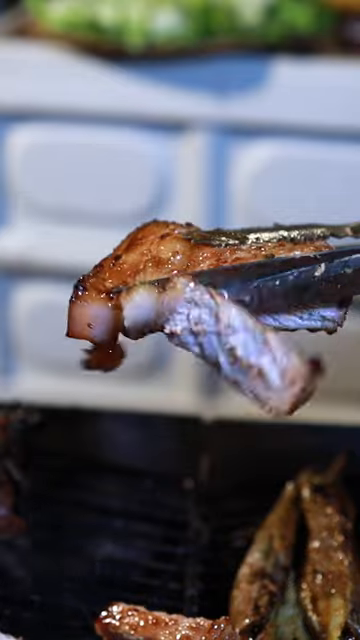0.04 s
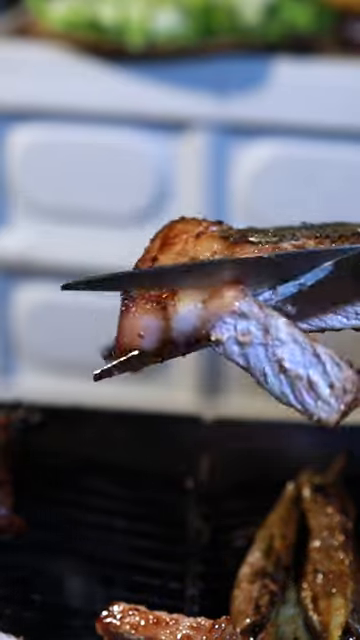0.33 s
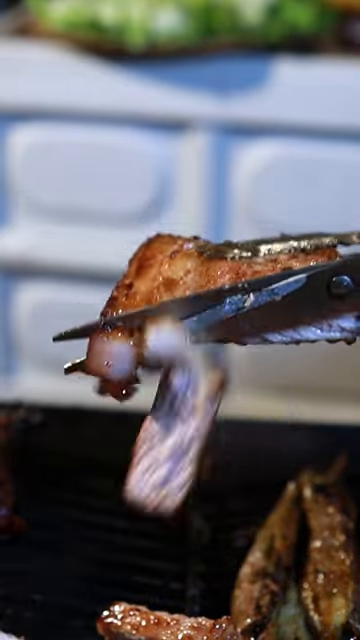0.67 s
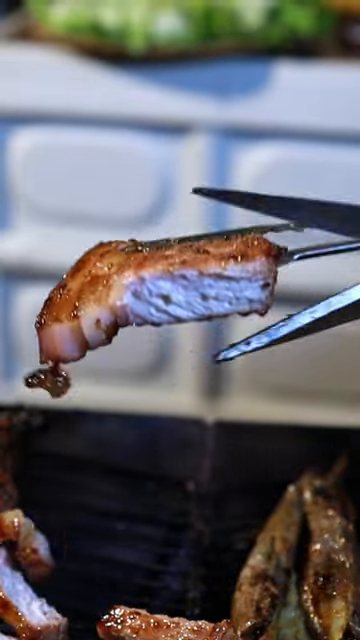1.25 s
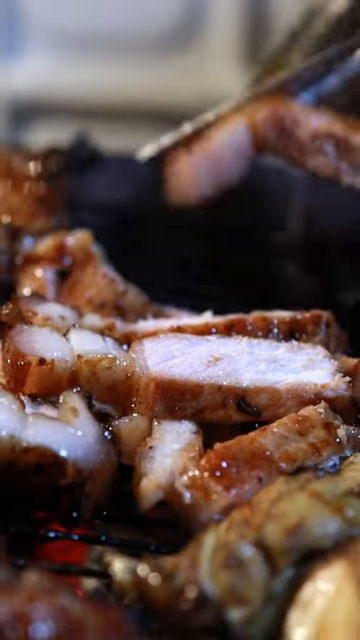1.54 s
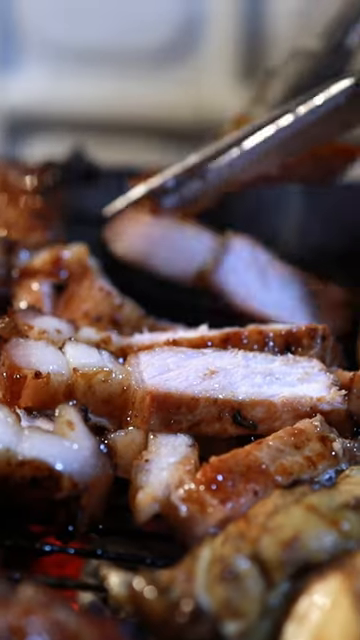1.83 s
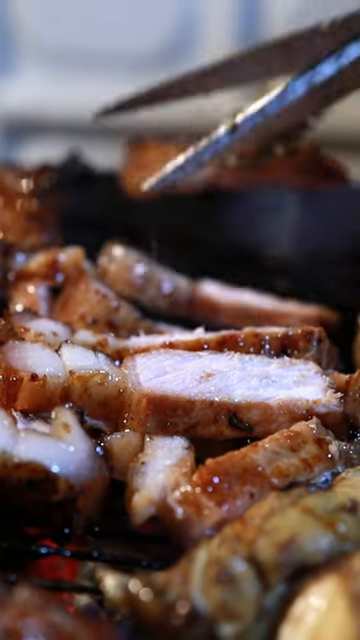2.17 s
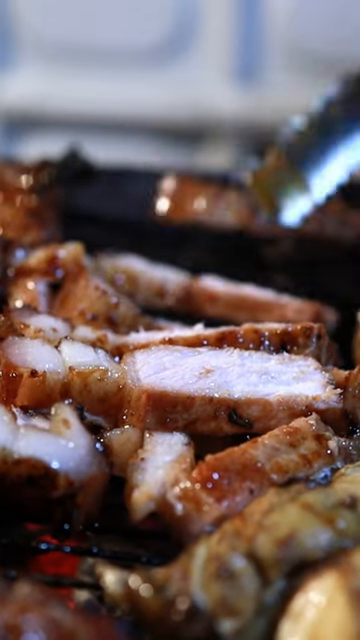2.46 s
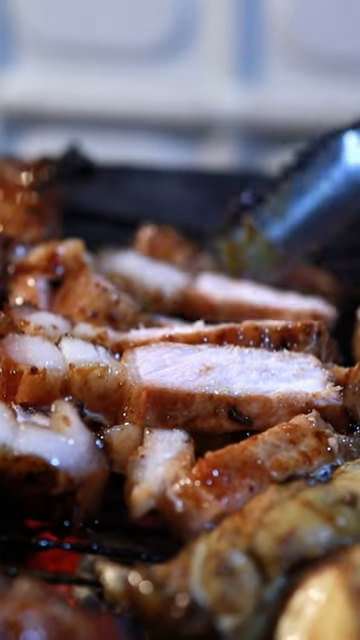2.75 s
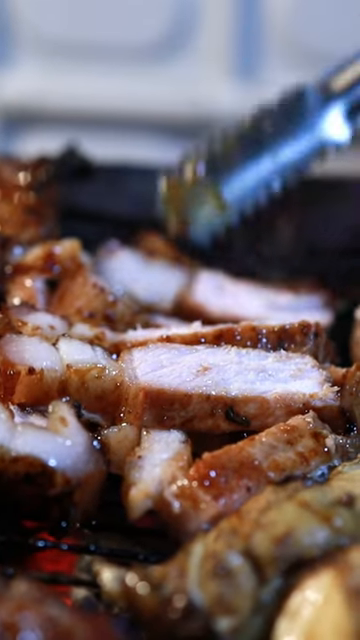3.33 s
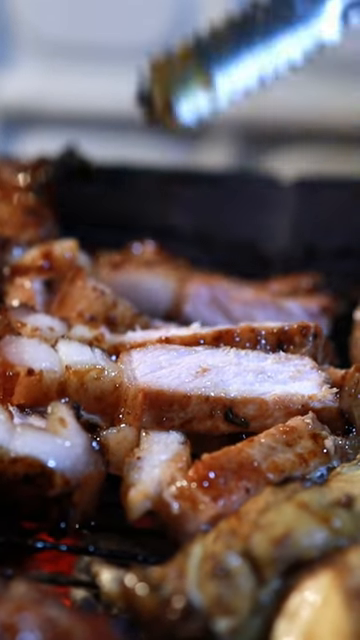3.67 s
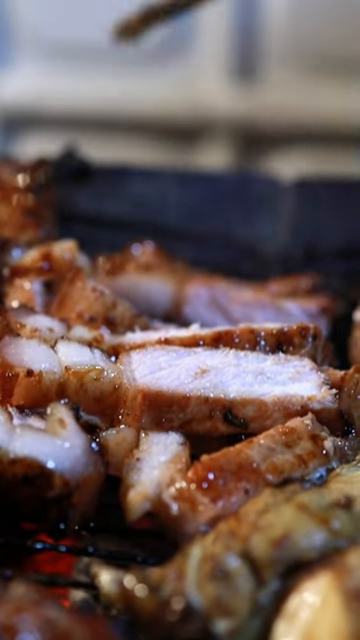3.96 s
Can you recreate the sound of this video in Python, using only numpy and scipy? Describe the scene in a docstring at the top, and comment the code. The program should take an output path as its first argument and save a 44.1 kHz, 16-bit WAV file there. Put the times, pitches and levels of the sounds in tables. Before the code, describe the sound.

Pork sizzles and pops close by on an outdoor grill, lightly at first. Scissors snap shut sharply at 0.9 seconds and scrape softly open. From 1.5 seconds the sizzle strengthens, and the scissors snap again at 2. Tongs knock dully on the meat, hardest at 2.8, then click on the grate around 3.2 to 3.4 before the sizzle swells. A faint hiss, trill and low air rumble lie behind.

```python
"""Outdoors, one microphone close to a charcoal grill. Pork sizzles and pops over a low rumble of air,
a far hiss, a shrill trill and, at first, faint calls. Scissors crunch through a slice, snap shut
at 0.9 s and scrape open. From 1.5 s the fat fries harder as fresh meat lands; at 2 s the blades snap
again. Tongs knock the pieces about, hardest at 2.8 s, then click on the grate as the sizzle swells."""
import sys
import numpy as np
from scipy import signal
from scipy.fft import rfft, irfft, next_fast_len
from scipy.io import wavfile
from scipy.ndimage import uniform_filter1d

SR = 44100
rng = np.random.default_rng(int(sys.argv[2]) if len(sys.argv) > 2 else 0)


def output_pcm(signal):
    """Save a mono or channel-first signal as 16-bit PCM at the path in sys.argv[1].

    Samples are clipped to [-1, 1] before scaling.
    """
    pcm = np.clip(np.atleast_2d(signal).T, -1, 1) * 32767
    wavfile.write(sys.argv[1], SR, np.round(pcm).astype(np.int16))


N = 176400
TIME = np.arange(N) / SR


def from_db(db):
    """Decibels to gain."""
    return 10 ** (np.asarray(db) / 20)


def unit_power(x):
    """Scale to a mean square of one."""
    return x / np.sqrt(np.mean(x ** 2) + 1e-20)


def level(rows):
    """Gain over time from (t/s, level/dB) points."""
    return from_db(np.interp(TIME, *np.transpose(rows)))


def colour(x, points):
    """Causal filter of unit mean power that follows (f/Hz, level/dB) points."""
    size = next_fast_len(N + SR // 2, True)
    hz, db = np.transpose(points)
    log_hz = np.log(np.fft.rfftfreq(size, 1 / SR) + 1)
    gain = unit_power(from_db(np.interp(log_hz, np.log(hz), db)))
    cepstrum = irfft(np.log(gain), size)
    cepstrum[1:size // 2] *= 2   # fold to minimum phase
    cepstrum[size // 2 + 1:] = 0
    return irfft(rfft(x, size) * np.exp(rfft(cepstrum)), size)[:N]


def fade(t60):
    """A quarter second of exponential decay."""
    return from_db(-60 * TIME[:SR // 4] / t60)


def burst(t60):
    """A dying puff of noise."""
    decay = fade(t60)
    return decay * np.tanh(2 * rng.standard_normal(len(decay)))


def ring(modes, ratio=1):
    """One blow on (f/Hz, level/dB, t60/s) modes of alternating sign."""
    t = TIME[:SR // 4]
    return sum((-1) ** k * from_db(db) * fade(t60) * np.sin(2 * np.pi * hz * ratio * t)
               for k, (hz, db, t60) in enumerate(modes))


def place(events):
    """Lay (t/s, level/dB, sound) events on the time line."""
    out = np.zeros(N)
    for t, db, sound in events:
        start = max(int(t * SR), 0)
        part = sound[:max(N - start, 0)]
        out[start:start + len(part)] += from_db(db) * part
    return out


# Air around the microphone: spectrum (f/Hz, level/dB) and course (t/s, level/dB)
AIR_SPECTRUM = [(12, -21.5), (25, -7.5), (32, 3), (44, -14.5), (62, -13.5), (85, -8), (110, -10),
                (135, -14), (165, -12.5), (260, -22.5), (450, -22.5), (900, -26.5), (3000, -47),
                (16000, -70)]
AIR_COURSE = [(0, -50.5), (.45, -49), (.8, -49), (1.4, -49.5), (1.9, -47.5), (2.35, -47.5), (2.7, -48.5),
              (3.3, -49), (4, -51)]
def air_rumble():
    """Open air rumbles low and almost steadily."""
    return level(AIR_COURSE) * colour(rng.standard_normal(N), AIR_SPECTRUM)


# Hiss in the distance: spectrum (f/Hz, level/dB) and course (t/s, level/dB)
HISS_SPECTRUM = [(200, -32.5), (700, -15), (1000, -10), (1270, -5.5), (1500, 1), (1830, -4), (2200, -0.5),
                 (2700, -3), (3600, -12.5), (4400, -16), (5500, -13), (6800, -20.5), (16000, -44)]
HISS_COURSE = [(0, -42.5), (.14, -45), (.3, -42.5), (.53, -45), (.75, -42.5), (1.0, -44), (1.15, -42),
               (1.28, -46.5), (1.47, -46), (2.0, -46.5), (2.14, -42), (2.3, -47), (2.55, -43.5),
               (2.95, -42.5), (3.4, -45.5), (4, -51.5)]
def far_hiss():
    """A midrange hiss rises and falls far behind the grill."""
    return level(HISS_COURSE) * colour(rng.standard_normal(N), HISS_SPECTRUM)


# Trill in the distance: spectrum (f/Hz, level/dB) and course (t/s, level/dB)
TRILL_SPECTRUM = [(1500, -39.5), (2300, -13), (2700, -5), (2900, 2), (3200, -3.5), (3600, -13),
                  (5000, -32.5)]
TRILL_COURSE = [(0, -47), (.15, -44.5), (.29, -39.5), (.45, -44), (.6, -46.5), (.95, -47), (1.2, -40),
                (1.35, -44), (1.55, -46.5), (2.5, -48.5), (3.0, -45.5), (3.3, -52), (3.8, -44)]
def far_trill(throb_hz=31.82, depth=0.43, wander_share=0.153):
    """A shrill band of noise throbs at a wandering rate, like distant frogs."""
    band = level(TRILL_COURSE) * colour(rng.standard_normal(N), TRILL_SPECTRUM)
    wander = unit_power(uniform_filter1d(rng.standard_normal(N), size=SR // 10))
    cycles = np.cumsum(throb_hz * (1 + wander_share * wander)) / SR
    return band * unit_power(1 + depth * np.sin(2 * np.pi * cycles))


# Calls far off (t/s, length/s, level/dB) and their spectrum (f/Hz, level/dB)
CALLS = [(0.192, 0.053, -42.5), (0.396, 0.079, -45), (0.608, 0.08, -39.5), (1.03, 0.1, -42),
         (1.318, 0.08, -40.5)]
CALL_SPECTRUM = [(500, -31), (850, -13), (1050, 2), (1280, -7), (1700, -0.5), (2100, -1), (2800, -13),
                 (6000, -45)]
def far_calls():
    """Short hoarse swells in two broad resonances, blurred by distance."""
    swells = place((t, db, np.sqrt(np.hanning(int(length * SR)))) for t, length, db in CALLS)
    return swells * colour(rng.standard_normal(N), CALL_SPECTRUM)


# Soft low bumps (t/s, level/dB, f/Hz)
LOW_BUMPS = [(.14, -42.5, 335), (1.02, -37, 215), (2.02, -43, 339), (2.955, -43, 256)]
def bumps(t60=0.071):
    """Each faint bump is one damped low tone."""
    return place((t, db, ring([(hz, 0, t60)])) for t, db, hz in LOW_BUMPS)


def knock(hz):
    """A soft contact sets off a heavily damped thud, with a little grit on top."""
    push = signal.unit_impulse(SR // 4) + 1e-18
    soft_push = signal.lfilter(*signal.butter(4, hz * 1.57, fs=SR), push)
    thud = signal.lfilter(*signal.butter(2, hz * 0.51, "high", fs=SR), soft_push)
    return thud / np.abs(thud).max() + from_db(-10) * burst(t60=0.0087)


# Tongs close by: modes (f/Hz, level/dB, t60/s), clicks (t/s, level/dB), knocks (t/s, level/dB, f/Hz)
TONG_MODES = [(1150, -8, 0.0027), (2400, -7, 0.0018), (5220, -6, .0055), (6250, -4, 0.0039),
              (10270, -10, 0.0058), (12800, -13, .004)]
GRATE_CLICKS = [(3.2018, -20), (3.2213, -10), (3.2324, -8), (3.2490, -16), (3.2599, -10.5), (3.274, -10),
                (3.2824, -19), (3.379, -6.5)]
MEAT_KNOCKS = [(.679, -32.5, 910), (.718, -28, 905), (.812, -28, 1110), (1.579, -27.5, 900),
               (1.636, -26, 1210), (1.671, -31, 995), (1.7327, -10, 940), (1.779, -23, 990),
               (2.836, -5.5, 1110), (3.349, -26, 1100), (3.353, -23.5, 1200), (3.4552, -17.5, 920)]
def tongs():
    """Tongs ring briefly on the grate and knock dully on the meat."""
    clicks = place((t, db, ring(TONG_MODES, ratio=rng.normal(1, 0.017))) for t, db in GRATE_CLICKS)
    knocks = place((t, db, knock(hz)) for t, db, hz in MEAT_KNOCKS)
    return clicks + knocks


# Blades parting: the rub's course (t/s, level/dB) and spectrum (f/Hz, level/dB)
RUB_COURSE = [(1.01, -90), (1.03, -47), (1.052, -39.5), (1.075, -53), (1.1, -49), (1.13, -92)]
RUB_SPECTRUM = [(1500, -21), (4800, -11), (5200, 1), (5600, -12), (7700, -15), (16000, -24)]
# Their ting (t/s, level/dB, f/Hz, t60/s)
BLADE_TINGS = [(1.160, -30, 12300, .025), (1.160, -33, 9450, .03)]
def scissors_open():
    """Steel slides on steel with a faint, rough ring, then tings."""
    rub = level(RUB_COURSE) * colour(rng.standard_normal(N), RUB_SPECTRUM)
    tings = place((t, db, ring([(hz, 0, t60)])) for t, db, hz, t60 in BLADE_TINGS)
    return rub + tings


# Two snaps near the microphone, three chattering contacts each (t/s, level/dB, pitch ratio)
BLADE_CONTACTS = [(.8829, 2, 1.006), (.8839, -6.5, 1.03), (.8858, -12.5, 1), (1.9576, 1, 0.99),
                  (1.9584, -1.5, 1.26), (1.9606, -12, 1.08)]
# The blades' modes (f/Hz, level/dB, t60/s) and the crack's spectrum (f/Hz, level/dB)
BLADE_MODES = [(1500, -11, 0.012), (1814, -12, 0.0076), (2130, -20, 0.011), (2620, -16, 0.011),
               (3380, -14.5, 0.0096), (3890, -14, 0.0092), (4840, -5.5, 0.0081), (5210, -14, 0.018),
               (6550, -17, 0.011), (9650, -5, 0.0093), (10600, -7.5, 0.012), (11950, -7.5, 0.0064),
               (14100, -18, 0.0091)]
CRACK_SPECTRUM = [(60, -6), (230, -5.5), (400, -12), (900, -13.5), (1500, 1.5), (3200, -2), (5200, 4),
                  (6300, 0), (8000, -1.5), (10000, 2.5), (13500, -3), (16000, 0)]
def scissors_shut(crack_db=-2.5, tail_db=-24.5):
    """The blades meet with a crack, a hand-damped ring and a short tail."""
    rings = place((t, db, ring(BLADE_MODES, ratio)) for t, db, ratio in BLADE_CONTACTS)
    cracks = place((t, db, from_db(crack_db) * burst(t60=0.01) + from_db(tail_db) * burst(t60=0.11))
                   for t, db, _ in BLADE_CONTACTS)
    return rings + colour(cracks, CRACK_SPECTRUM)


# Close pops of fat and fibre (t/s, level/dB) and their spectrum (f/Hz, level/dB)
FAT_POPS = [(0.059, -19), (0.072, -22), (0.084, -22), (.128, -29), (.320, -19.5), (.353, -26), (0.379, -27),
            (.429, -25), (0.456, -18.5), (.671, -23), (.680, -18), (.720, -19.5), (.786, -28), (.811, -18),
            (.859, -21.5), (.989, -29), (1.118, -17), (1.161, -26), (1.219, -28), (1.255, -24),
            (1.317, -16.5), (1.340, -20), (1.603, -12.5), (1.636, -13), (1.671, -17), (1.7328, -11.5),
            (1.843, -17.5), (2.338, -27), (2.349, -22.5), (2.496, -16.5), (2.585, -20), (2.916, -18.5),
            (3.0138, -9), (3.031, -16.5), (3.311, -13), (3.4555, -14.5), (3.631, -10.5), (3.645, -17),
            (3.653, -15), (3.752, -16), (3.787, -18), (3.809, -10), (3.936, -18), (3.944, -17.5),
            (3.961, -16.5)]
POP_SPECTRUM = [(200, -13.5), (800, -4), (2500, 0), (5000, 2), (7500, 0.5), (12500, 0), (16000, -3.5)]
def pops(gain_db=-1.5):
    """Larger bubbles and parting fibres crack one by one."""
    cracks = place((t, db + gain_db, burst(t60=0.0048)) for t, db in FAT_POPS)
    return colour(cracks, POP_SPECTRUM)


# Pork frying close by: vigour (t/s, level/dB), spectrum (f/Hz, level/dB), treble shelf (t/s, level/dB)
FRY_VIGOUR = [(0, -38), (.055, -35), (.095, -45.5), (.2, -49.5), (.45, -46.5), (.6, -45.5), (.72, -45),
              (1.0, -46), (1.12, -51), (1.22, -47), (1.525, -47), (1.545, -35), (1.595, -38),
              (1.635, -29.5), (1.66, -36.5), (1.8, -38.5), (2.02, -38.5), (2.06, -35), (2.15, -34.5),
              (2.2, -37.5), (2.4, -34), (2.65, -35.5), (2.83, -36), (3.1, -37.5), (3.2, -35.5), (3.4, -35),
              (3.6, -35), (3.66, -32), (3.8, -30.5), (3.95, -32), (4, -31.5)]
FRY_SPECTRUM = [(200, -17.5), (700, -3.5), (1500, -3), (2100, -5.5), (2800, 3), (3700, 0.5), (4600, -1),
                (5400, 4), (6200, 2), (7100, -3.5), (8600, -1.3), (10100, 2.5), (11400, -2), (12700, 2.1),
                (13700, -2.5), (14700, -1.2), (16000, -4)]
FRY_TREBLE = [(0, -.5), (1.5, -0.87), (1.65, .5), (2.1, 1.4), (2.4, .5), (2.6, -1.7), (3.0, -0.69),
              (3.4, -1), (3.85, -0.17)]
def sizzle(bubbles_db=-1.64, steam_db=-6.5, spread_db=3.5, shelf_hz=7540):
    """Tiny bubbles burst in the fat, more often as it fries harder, over a hiss of steam."""
    vigour = level(FRY_VIGOUR)
    bubbles_per_s = 2600 * (vigour / from_db(-35)) ** 1.3
    sizes = unit_power(from_db(spread_db * np.minimum(rng.exponential(1, N), 5.5)))
    onsets = rng.random(N) < bubbles_per_s / SR
    energy = onsets * sizes ** 2 * SR / bubbles_per_s   # averages one at any rate
    puff = fade(t60=0.0034) ** 2
    envelope = np.sqrt(np.abs(signal.fftconvolve(energy, puff / puff.sum())[:N]))
    grain, steam = rng.standard_normal((2, N))
    bubbles = from_db(bubbles_db) * envelope * np.sign(grain)
    fry = colour(vigour * (bubbles + from_db(steam_db) * steam), FRY_SPECTRUM)
    treble = signal.lfilter(*signal.butter(1, shelf_hz, "high", fs=SR), fry)
    return fry + (level(FRY_TREBLE) - 1) * treble


def scene():
    """The grill close up and the open air behind it, at one microphone."""
    near = sizzle() + pops() + scissors_shut() + scissors_open() + tongs() + bumps()
    background = far_hiss() + far_trill() + air_rumble() + far_calls()
    return (near + background)[None]


def record(dry):
    """The close snaps softly overload the microphone input; a steep low-pass cuts the top."""
    ceiling, stop_hz = 1.17, 16300
    clipped = ceiling * np.tanh(dry / ceiling)
    return signal.sosfilt(signal.cheby2(16, 60, stop_hz, fs=SR, output="sos"), clipped)


dry = scene()
out = record(dry)
output_pcm(out)
```